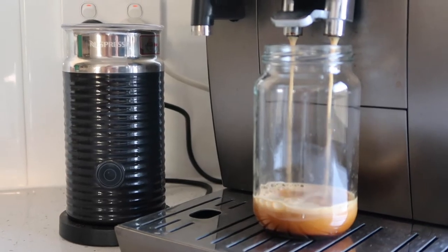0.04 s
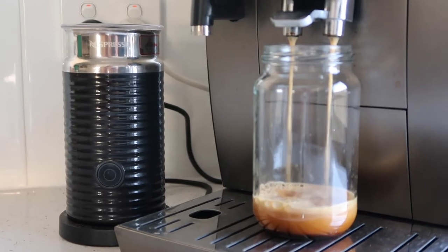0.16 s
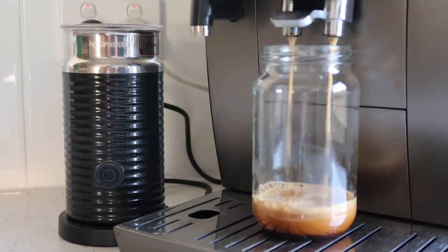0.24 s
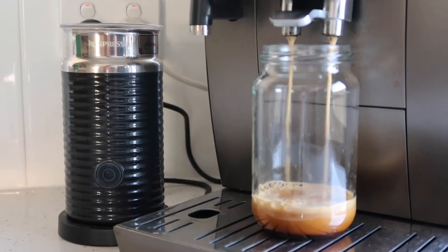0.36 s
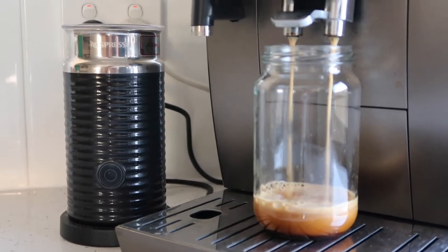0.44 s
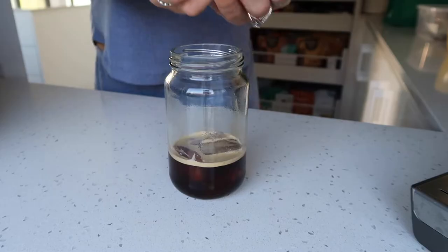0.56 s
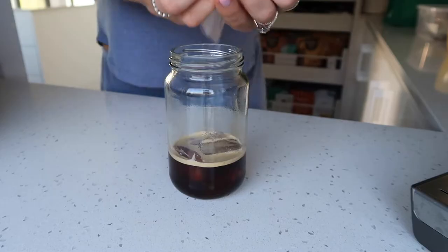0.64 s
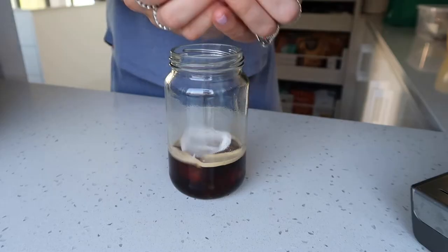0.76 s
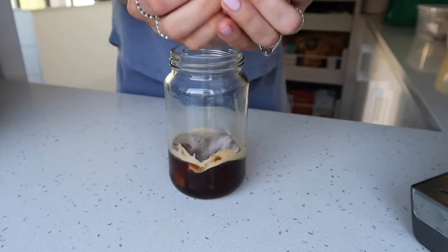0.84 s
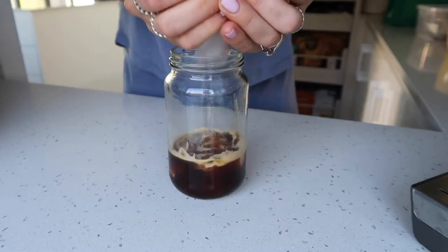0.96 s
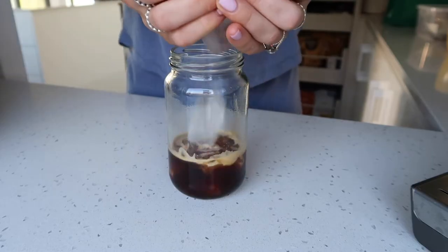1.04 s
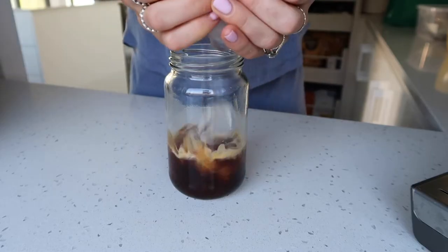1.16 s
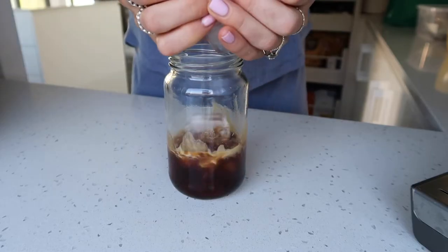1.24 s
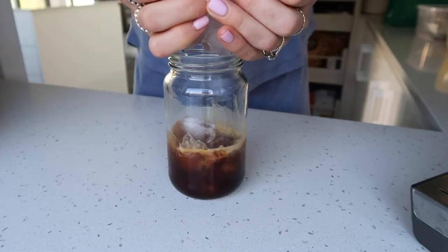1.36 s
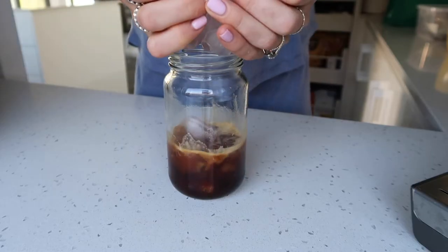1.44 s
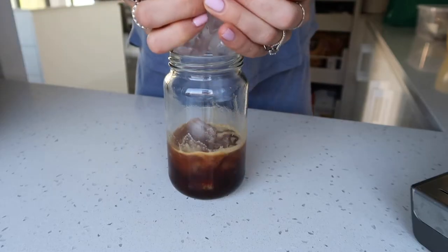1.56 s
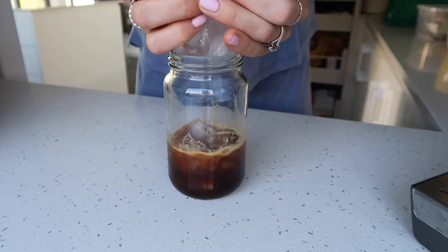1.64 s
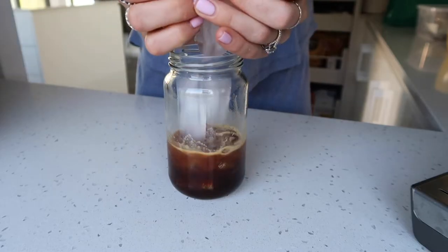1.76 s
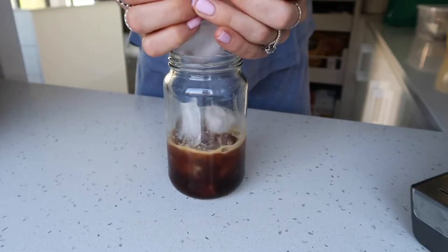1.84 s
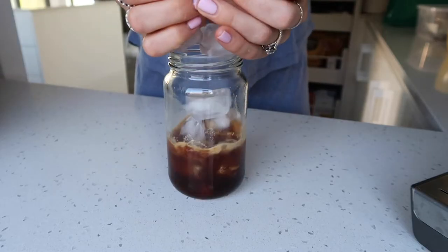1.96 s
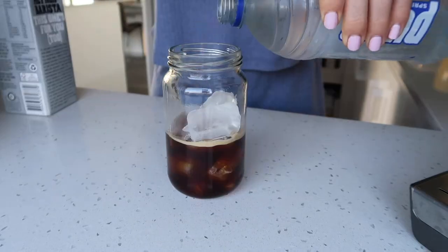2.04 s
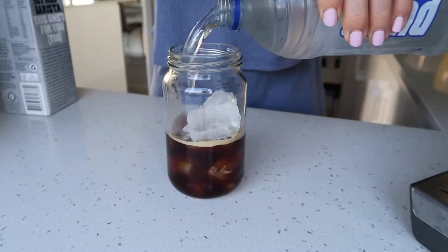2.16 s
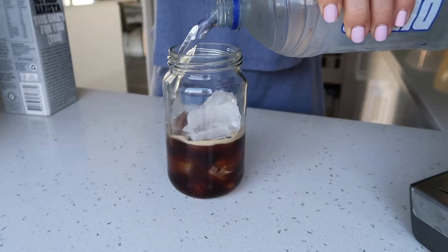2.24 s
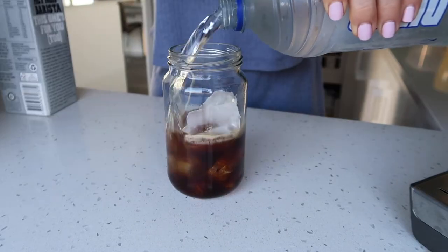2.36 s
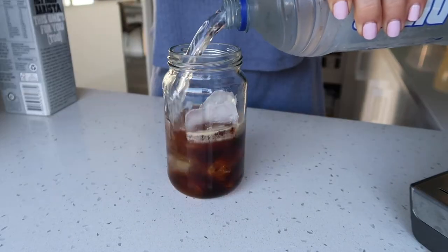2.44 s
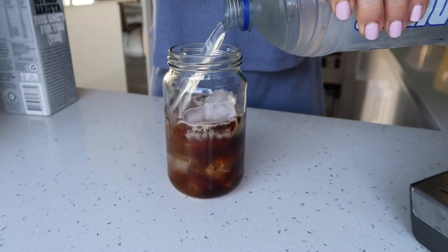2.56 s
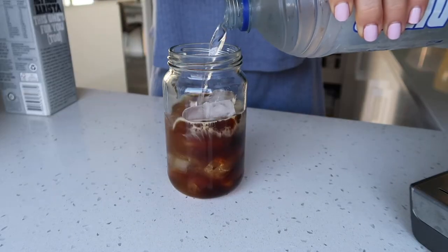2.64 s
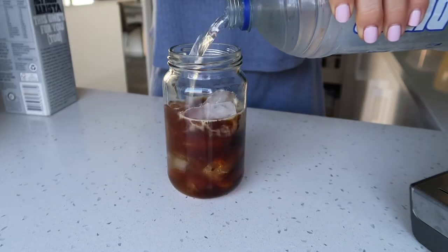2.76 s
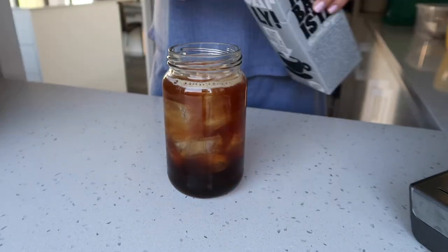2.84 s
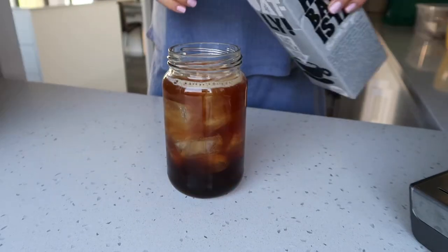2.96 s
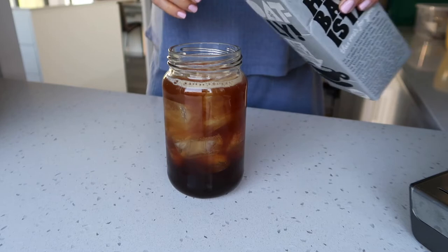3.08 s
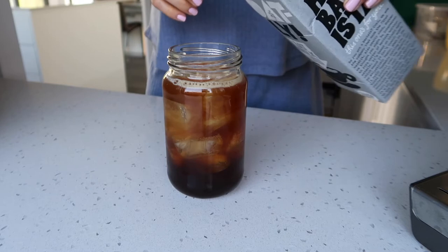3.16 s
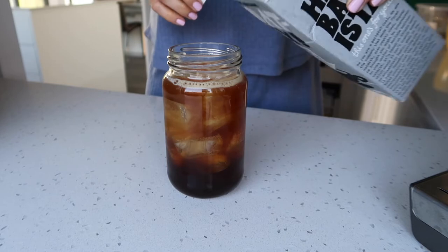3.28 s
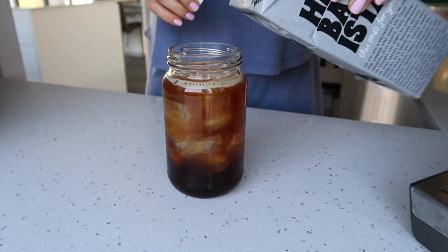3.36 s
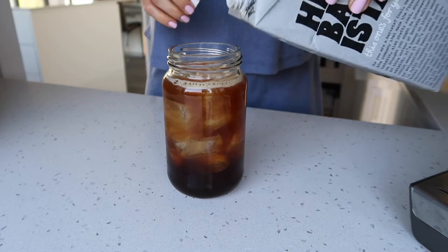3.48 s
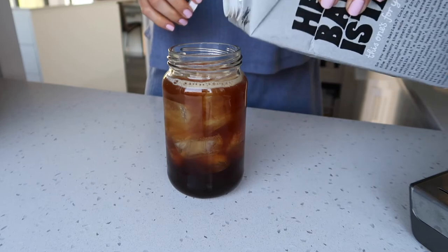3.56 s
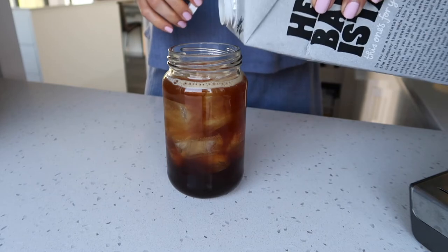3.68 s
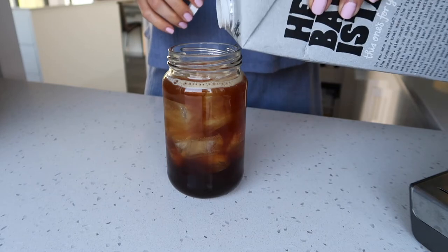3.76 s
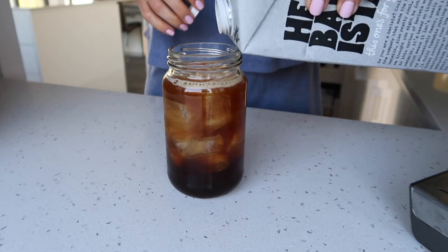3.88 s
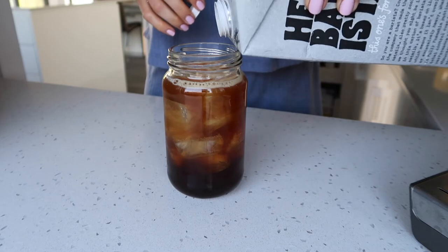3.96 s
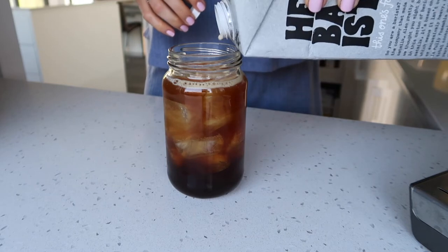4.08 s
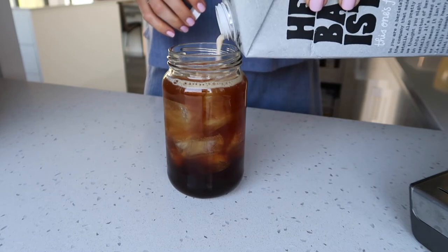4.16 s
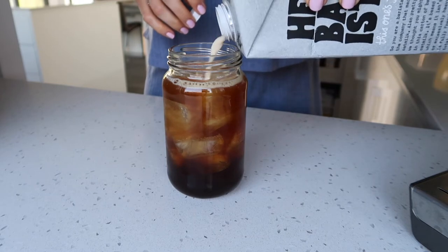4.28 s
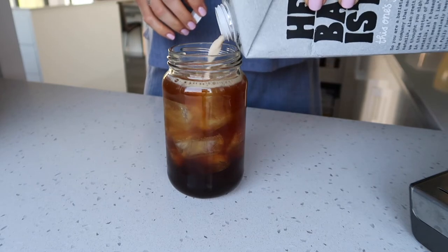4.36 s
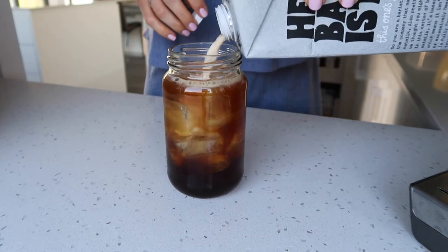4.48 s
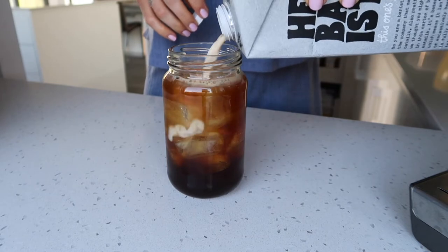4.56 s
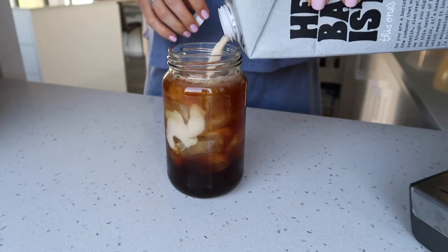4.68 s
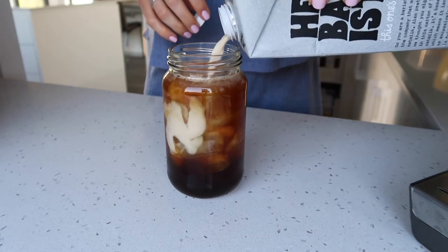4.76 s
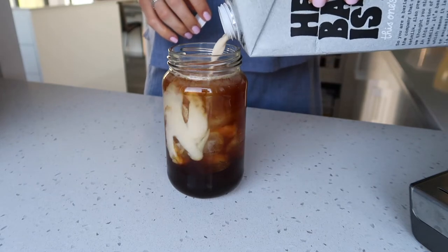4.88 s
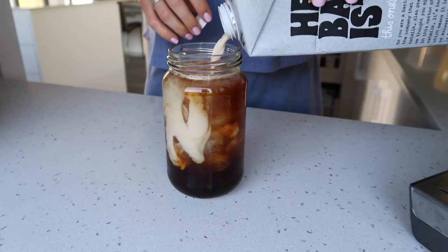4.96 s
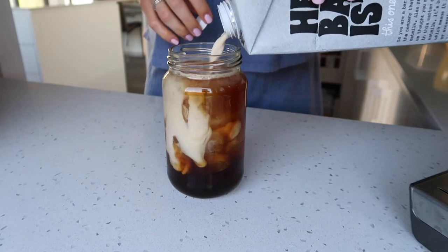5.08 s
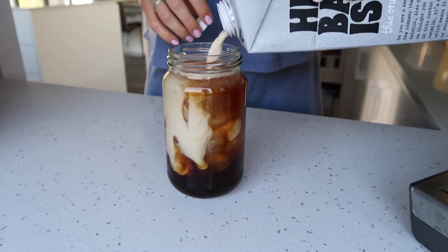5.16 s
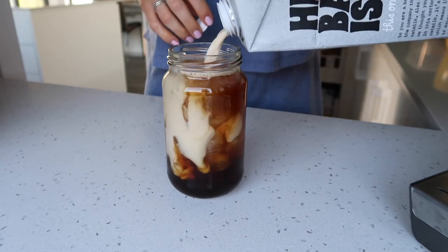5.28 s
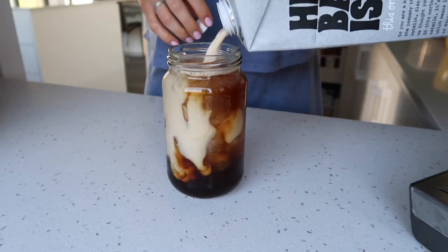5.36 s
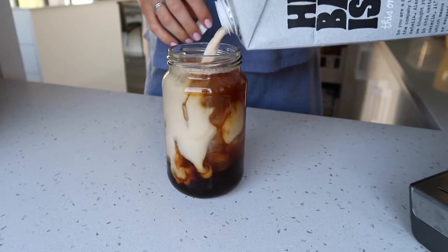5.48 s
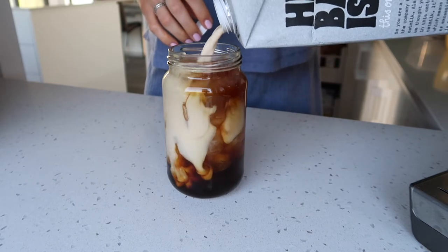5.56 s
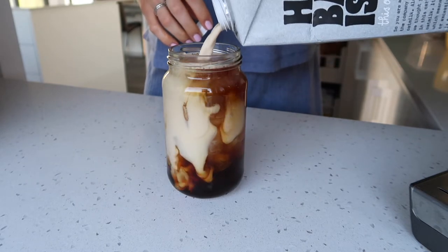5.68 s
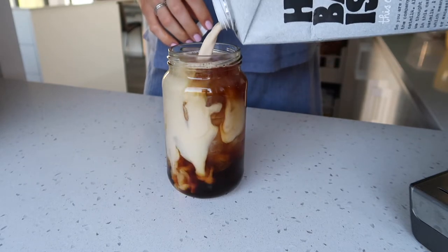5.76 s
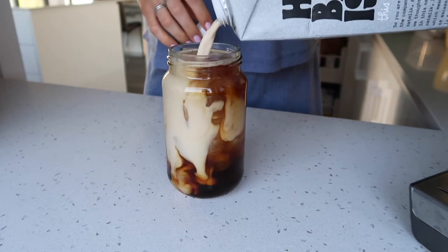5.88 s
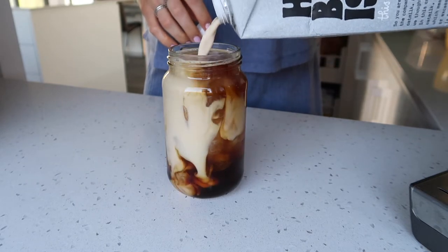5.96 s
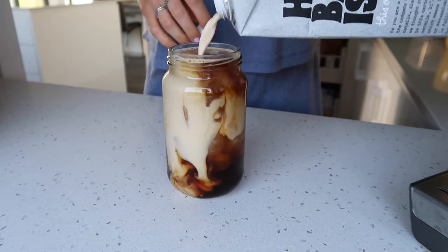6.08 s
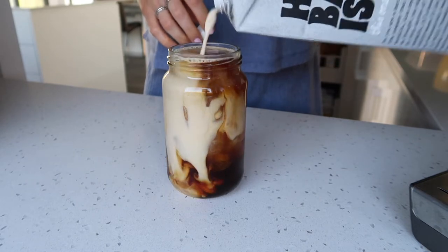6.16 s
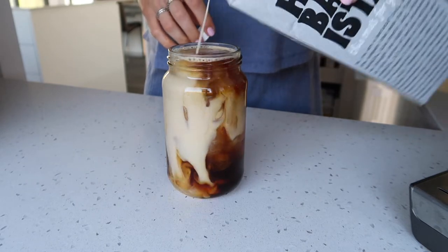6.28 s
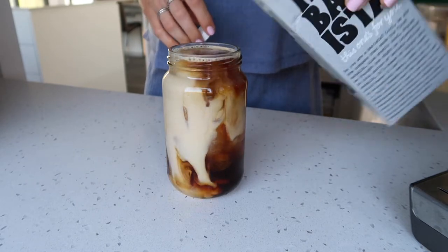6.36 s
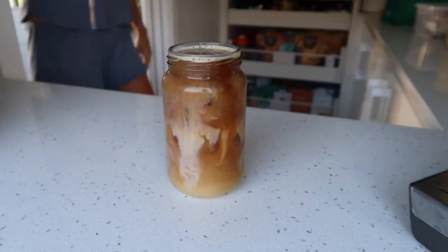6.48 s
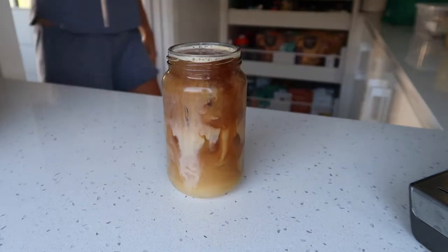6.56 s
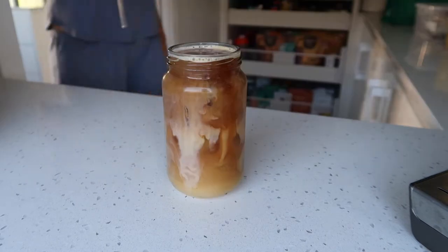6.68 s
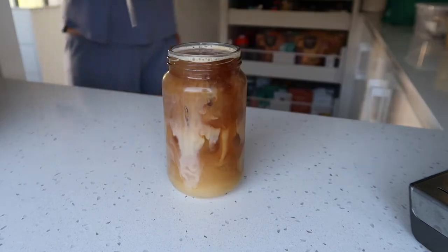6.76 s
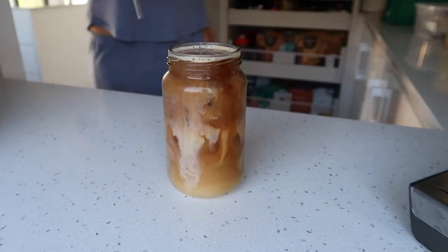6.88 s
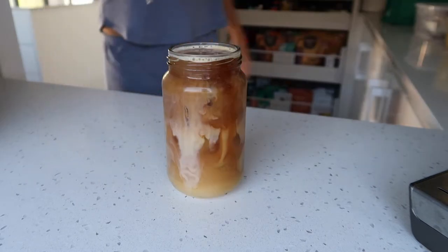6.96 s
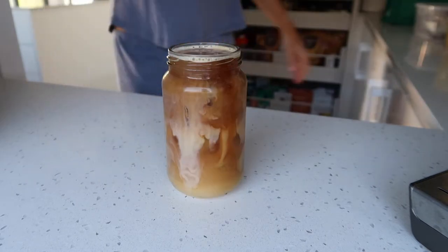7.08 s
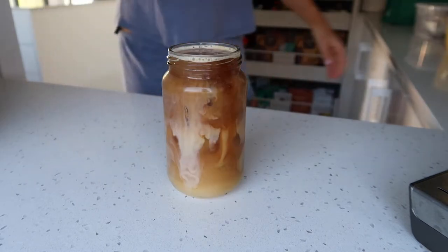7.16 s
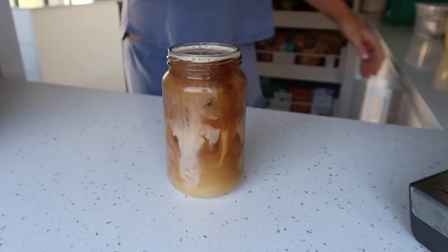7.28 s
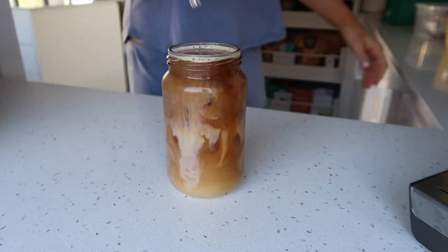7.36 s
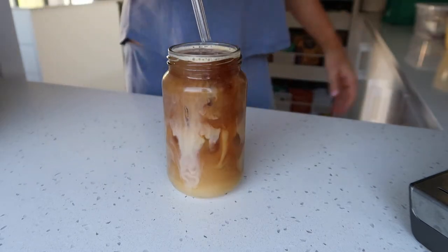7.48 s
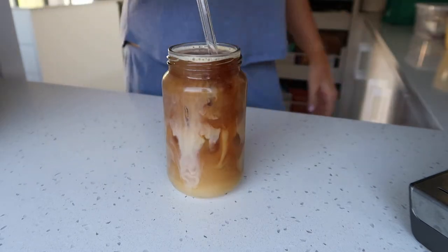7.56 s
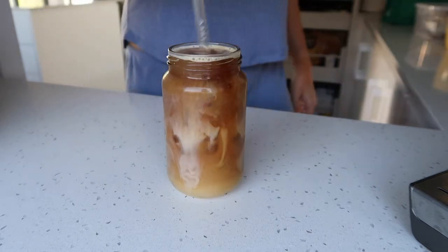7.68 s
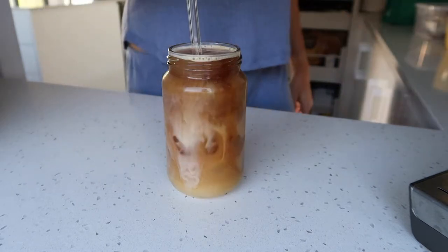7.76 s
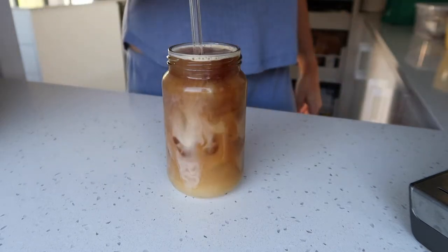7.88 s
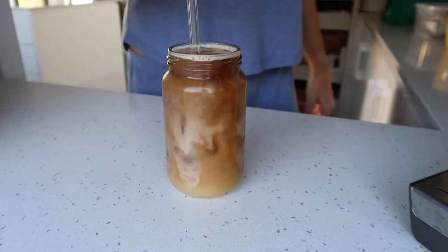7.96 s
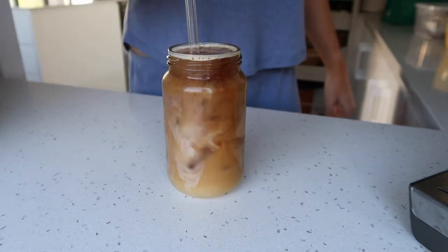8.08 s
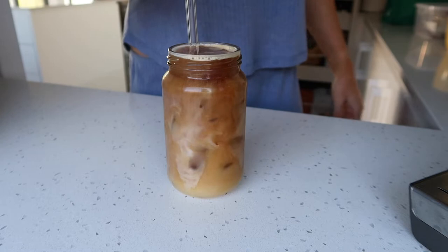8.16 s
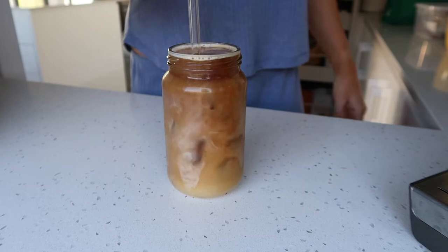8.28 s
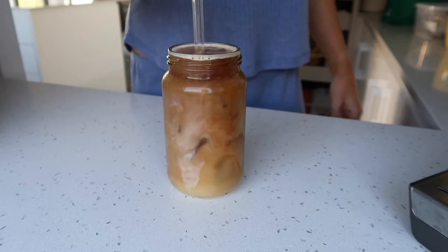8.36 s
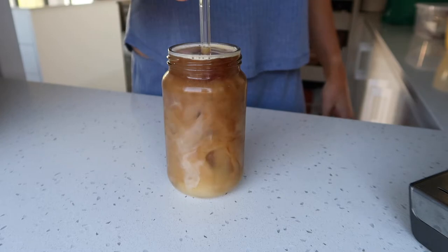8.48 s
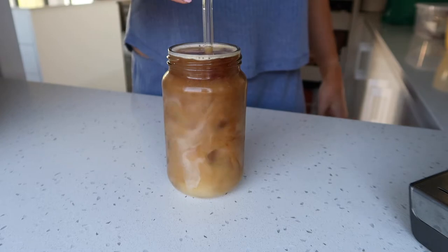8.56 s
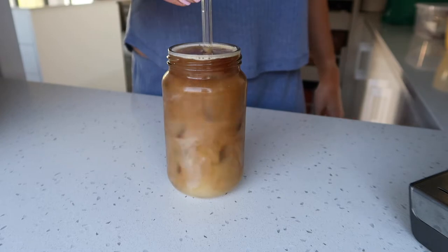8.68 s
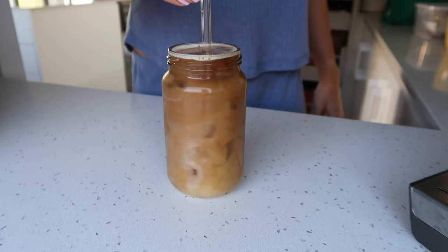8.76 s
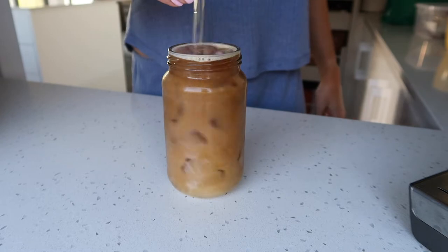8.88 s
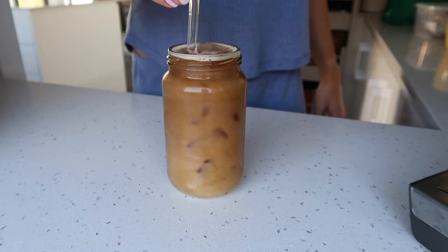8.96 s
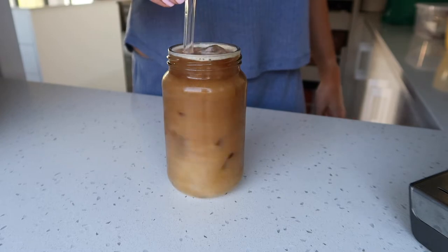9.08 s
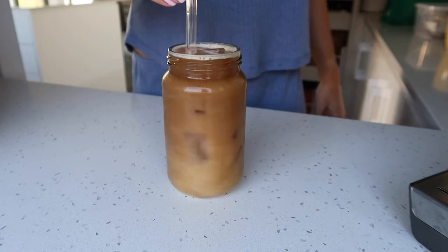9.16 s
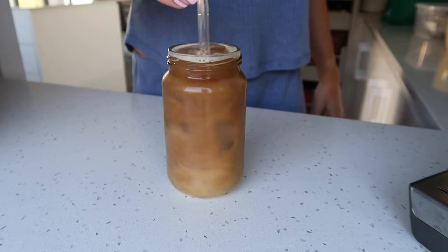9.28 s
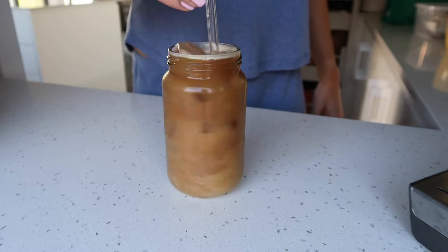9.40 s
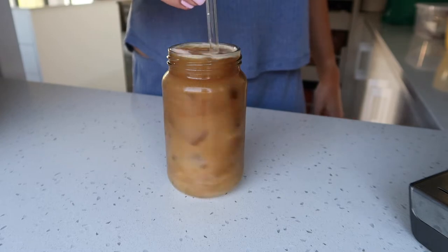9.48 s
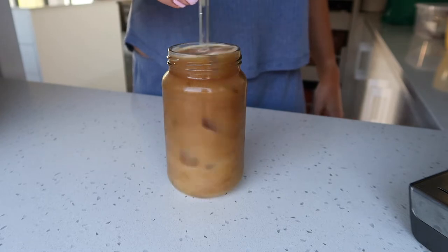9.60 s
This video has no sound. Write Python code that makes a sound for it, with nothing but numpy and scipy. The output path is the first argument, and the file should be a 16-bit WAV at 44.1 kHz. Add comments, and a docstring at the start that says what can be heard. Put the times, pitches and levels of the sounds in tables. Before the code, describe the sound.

A coffee machine pump buzzes and stops, ice clinks into a glass jar, water glugs, a carton buckles, then a straw stirs the ice.

```python
"""A small kitchen, close to the counter: a coffee machine's pump buzzes and stops.
Ice cubes crack and ring in a glass jar, and water glugs in from a plastic bottle as rising air tones.
A milk carton gulps and knocks as its thin walls buckle, then a straw stirs the ice: knocks, ticks, grinding.
A faint bird, a gliding sine, whistles far off; decaying noise makes the small room ring briefly."""
import sys
import numpy as np
from scipy import signal
from scipy.fft import rfft, irfft
from scipy.io import wavfile
from scipy.ndimage import uniform_filter1d

SR = 44100
rng = np.random.default_rng(int(sys.argv[2]) if len(sys.argv) > 2 else 0)


def pcm_store(signal):
    """Save signal as 16-bit PCM."""
    levels = np.round(np.clip(np.atleast_2d(signal), -1, 1) * 32767)
    wavfile.write(sys.argv[1], SR, levels.astype(np.int16).T)


N = 424683  # samples

# room background spectrum: (frequency [Hz], relative density [dB per Hz])
ROOM_AIR = [(20, -8.5), (107, -3), (278, -10.5), (3400, -21), (11000, -38.5), (14000, -52)]
AIR_DB = -54
# difference between the two channels: (frequency [Hz], side minus mid [dB])
STEREO_WIDTH = [(100, -37), (1300, -23.5), (2400, -20.5), (4400, -8), (8000, 6)]

PUMP_HZ, PUMP_STOP_S = 50.2, 0.5333
# pump housing, multiples of the stroke rate from the first upward: relative level [dB]
PUMP_ORDERS = [-3.5, -11, 0.5, -10, -22, -17, -11, -21, -26, -6.5, -13, -19, -22, -20, -15.5, -24, -34, -18,
               -24]
# pump rattle and running coffee: (frequency [Hz], relative density [dB per Hz])
PUMP_HISS = [(100, -10.5), (150, 1), (230, -20.5), (520, -7.5), (900, -16.5), (3900, -29), (14000, -54.5)]
# water whining through the machine's valve: (frequency [Hz], level [dB])
VALVE_WHINE = [(600, -46), (2790, -50), (3880, -52)]

# ice falling into the jar: (time [s], level [dB], treble re body [dB], loudest ring [Hz])
ICE_FALLS = [(0.741, -32.5, -4.5, 3490), (0.781, -29.5, 14.5, 4860), (0.812, -18.5, -6, 2350),
             (0.82, -22, -1.5, 3600), (0.973, -36.5, -7.5, 3340), (1.07, -20, -12, 1750),
             (1.2, -20.5, -2, 2430), (1.213, -22, -3, 3517), (1.602, -30.5, -5, 3800),
             (1.656, -36, -0.5, 3730), (1.763, -35, -0.5, 3560), (1.775, -27, -11, 1500),
             (1.826, -25.5, -3, 3855), (1.831, -16, -1, 2467), (1.951, -31, 4, 3790), (1.972, -28, 0, 1425),
             (1.992, -21.5, -18, 1414), (2.044, -28.5, -6.5, 1430)]
# cubes sliding over one another: (time [s], gain of the unrest [dB])
ICE_SLIDES = [(.675, -29), (1.125, -21.5), (2.01, -32.5)]
# jar with ice and coffee, its modes: (frequency [Hz], relative level [dB], t60 [s])
JAR_MODES = [(118, -7, 0.31), (229.3, -3.5, 0.133), (616, -0.5, 0.09), (739, 8, 0.056), (1417, 3.5, 0.087),
             (1736, -4, 0.1), (2210, -9.5, 0.103), (2444, -0.5, 0.12), (3496, 9.5, 0.03), (3810, 7, 0.025)]
# colour of ice on glass: (frequency [Hz], relative level [dB])
ICE_CRACK = [(200, -9.5), (1400, 5), (3000, -3.5), (3800, -3), (5500, -12.5), (14000, -49)]
# the loudest ring of each fall: level (dB re the fall) and decay
CLINK_DB, CLINK_T60_S = 6.5, 0.061
# unrest after each fall (dB re the fall) and its decay; the ice sounds break off at ICE_END_S
SETTLE_DB, SETTLE_T60_S, ICE_END_S = -22, 2.14, 2.14
# cubes ticking against each other, in the hands and in the jar: (time [s], peak level [dB])
ICE_TICKS = [(0.634, -20), (0.647, -20.5), (0.67, -24), (0.722, -17.5), (0.749, -15.5), (1.359, -29),
             (1.52, -36), (7.848, -18.5), (8.902, -15), (9.097, -17.5), (9.474, -18), (9.597, -15.5)]
TICK_HZ, TICK_T60_S = (1504, 4150), 0.009  # band, decay

# water stream: it swells, runs and is tipped back; POUR_DB is the gain of the flow
POUR_START_S, POUR_END_S, POUR_RAMP_S, POUR_DB = 2.26, 3.04, 0.14, -47
# the bottle's last gulp surging into the jar: (time [s], gain of the flow [dB])
LAST_SURGE = [(2.855, -26.5)]
# splashes off the ice: (time [s], level of the first plink [dB], pitch [Hz])
SPLASHES = [(2.293, -36.5, 5910), (2.387, -28.5, 3600), (2.453, -24, 3860), (2.473, -26.5, 2160),
            (2.528, -26, 2800), (2.673, -23, 4310)]
PLINK_T60_S = 0.021
# large air bubbles: (time [s], level [dB], starting pitch [Hz], rise [octaves per s], t60 [s])
GLUGS = [(2.056, -19.5, 234.2, 0.75, 0.14), (2.685, -21, 147.3, 5.6, 0.3), (2.787, -21.5, 191, 5.4, 0.12),
         (2.845, -20, 228, 2.2, 0.12), (3.808, -26.5, 188, 2.1, 0.12), (3.862, -22.5, 181.4, 2.4, 0.18)]

# bottle and carton walls flexing in the hand and as they pour: (time [s], level [dB])
WALL_FLEXES = [(2.793, -24.5), (2.847, -22), (3.068, -35), (3.111, -44), (3.377, -51.5), (3.809, -32.5),
               (3.862, -32), (3.926, -38.5), (4.61, -51.5), (4.782, -53), (5.022, -54.5), (5.248, -36.5),
               (5.3, -31), (5.324, -22), (5.374, -25), (5.407, -19.5), (5.428, -25), (5.514, -24.5),
               (5.571, -30.5), (6.045, -28), (6.068, -30.5), (6.097, -33.5), (6.154, -27.5), (6.431, -54),
               (7.005, -57)]
# small creases tick brightly, big buckles are dull: (strength [dB], treble re body [dB])
FLEX_BRIGHTNESS = [(-48.5, 3.5), (-45, -12.5)]
# thin container walls and the air inside: (frequency [Hz], relative level [dB], t60 [s])
WALL_MODES = [(68.4, -7.5, 0.2), (236.8, 3, 0.15), (316, 1, 0.1), (484, -1, 0.09), (953, 4, 0.059),
              (2197, -10, 0.089)]
# colour of a flexing wall: (frequency [Hz], relative level [dB])
FLEX_CRACK = [(250, -15), (1000, 1), (2400, -5.5), (3200, -15.5), (6000, -21.5), (14000, -54.5)]
# the carton crackles faintly while it is held
HOLD_START_S, HOLD_END_S, CRACKLE_DB = 2.9, 6.45, -67.5

# distant bird's gliding whistle: (time [s], pitch [Hz])
BIRD_GLIDE = [(4.85, 2710), (4.92, 3220), (4.935, 4550), (4.963, 4610), (4.975, 3530), (4.99, 3400),
              (5.05, 3920)]
BIRD_DB, BIRD_FADE_S = -48, 0.037
# its fainter level notes: (time [s], pitch [Hz])
BIRD_NOTES = [(4.29, 3640), (6.49, 3540), (7.17, 3550)]
NOTE_S, NOTE_DB = 0.098, -57.5

# rustles as the carton is handled and put away: (time [s], level [dB], band centre [Hz])
SWISHES = [(6.295, -45.5, 1310), (6.465, -47, 1100), (6.646, -41.5, 3570), (6.86, -50, 450),
           (7.015, -51, 1500)]
# dull thuds, a step and the straw reaching the jar's base: (time [s], level [dB], pitch [Hz], t60 [s])
THUDS = [(7.443, -32.5, 169, 0.051), (7.702, -12.5, 565, 0.028)]

# straw and cubes knocking on the glass: (time [s], level [dB], treble re body [dB])
STIR_KNOCKS = [(7.701, -27, -6.5), (7.913, -24, -11.5), (8.127, -33.5, -29), (8.254, -36, -10),
               (8.375, -32, -5), (8.471, -29, -12), (8.502, -30, -13), (8.597, -31.5, -9),
               (8.642, -31.5, -9.5), (8.706, -29, -14), (8.856, -34.5, 8), (8.93, -31, 6.5),
               (8.937, -27, 2), (8.966, -26.5, 0.5), (9.077, -27.5, -6), (9.29, -34, -13),
               (9.342, -21, -23), (9.424, -26.5, -6), (9.565, -27.5, 3)]
# the straw rubbing along the glass: (time [s], gain of the rubbing [dB])
STRAW_RUBS = [(8.465, -28.5), (9.255, -28.5)]
# the jar filled to the neck, its modes: (frequency [Hz], relative level [dB], t60 [s])
FULL_JAR_MODES = [(115.6, -3, 0.33), (212.4, 0, 0.18), (561, -3.5, 0.15), (718, 3.5, 0.1),
                  (933, -1.5, 0.18), (1290, 7.5, 0.11), (2093, 6, 0.089)]
# colour of a stirring knock: (frequency [Hz], relative level [dB])
STIR_CRACK = [(300, -19.5), (600, 8), (2400, 8.5), (4400, -2.5), (6500, -18.5), (14000, -59.5)]
# gain of the swirl: it starts, gathers speed (dB per s) and then holds (dB)
STIR_START_S, SWIRL_START_DB, SWIRL_GAIN_DB_PER_S, SWIRL_TOP_DB = 7.78, -46.5, 5.5, -41
# each knock sets the floating cubes going (dB re the knock)
SHOVE_DB, SHOVE_T60_S = -9.5, 0.56
RUMBLE_HZ = (189, 240)  # band in which the stirred jar rumbles

CUTOFF_HZ = 15200


def from_db(db):
    """Decibels to gain."""
    return 10 ** (np.asarray(db) / 20)


def rms_one(x):
    """Scale to unit power."""
    return x / np.sqrt(np.mean(x ** 2) + 1e-20)


def seconds(size):
    """Time axis in seconds."""
    return np.arange(size) / SR


def at_hz(points, hz):
    """Read a spectrum on a log-frequency axis."""
    f, value = np.transpose(points)
    return np.interp(np.log(hz + 1), np.log(f), value)


def cut(x, hz, kind, order=2):
    """Butterworth filter."""
    return signal.sosfilt(signal.butter(order, hz, kind, fs=SR, output="sos"), x)


def colour(x, spectrum, size=2048):
    """Causal minimum-phase filter with the given spectrum, built by folding its cepstrum."""
    hz = np.arange(size + 1) * SR / (2 * size)
    cepstrum = irfft(np.log(from_db(at_hz(spectrum, hz))))
    cepstrum[1:size] *= 2
    cepstrum[size + 1:] = 0
    response = irfft(np.exp(rfft(cepstrum)))[:size]
    return signal.fftconvolve(x, response)[:len(x)]


def noise(spectrum):
    """Coloured noise of unit power."""
    return rms_one(colour(rng.standard_normal(N), spectrum))


def drift(rate):
    """Slow chance with spread 1: random knots, rate of them per second, joined by lines."""
    knots = rng.standard_normal(2000)
    return np.interp(seconds(N) * rate, np.arange(len(knots)), knots)


def fade(t, t60):
    """Exponential decay by 60 dB in t60 seconds."""
    return np.exp(-np.log(1000) * t / t60)


def gate(start, end, ramp_s):
    """Attack, hold and release."""
    t = seconds(N)
    return np.clip(np.minimum(t - start, end - t) / ramp_s, 0, 1)


def add(out, s, sound):
    """Mix a sound in at a time."""
    i = max(round(s * SR), 0)
    out[i:i + len(sound)] += sound[:max(N - i, 0)]


def swells(rows, rise_t60, fall_t60, size=22050):
    """Gain that grows to each (time [s], level [dB]) and dies away again."""
    out, t = np.zeros(N), seconds(size)
    for s, db in rows:
        swell = np.r_[fade(t, rise_t60)[::-1], fade(t, fall_t60)]
        add(out, s - size / SR, from_db(db) * swell)
    return out


def sweep(hz):
    """Sine that follows a changing pitch."""
    return np.sin(2 * np.pi * np.cumsum(hz) / SR)


def low_note(db, hz, t60, rise=0):
    """A softly started damped tone that may rise (octaves per s)."""
    t = seconds(SR // 2)
    onset = 1 - np.exp(-t / 0.00056)
    return from_db(db) * sweep(hz * 2 ** (rise * t)) * fade(t, t60) * onset


def grains(start, end, per_s, centre_hz, octaves, cycles, size=2400):
    """Contacts or bubbles at random times, each a quick swell and ring at its own pitch; unit power."""
    out, t = np.zeros(N), seconds(size)
    for when, strength, *pitch in rng.random((int(per_s * (end - start)), 4)):
        hz = min(centre_hz * 2 ** (octaves * (sum(pitch) - 1)), SR / 4)
        tone = np.sin(2 * np.pi * hz * t) * fade(t, cycles / hz) * (1 - np.exp(-hz * t))
        add(out, start + when * (end - start), from_db(20 * strength ** 2) * tone)
    return out / out[round(start * SR):round(end * SR)].std()


def blows(table, modes, crack, crack_t60, scatter_db, scatter_t60, ring_db, detune, size=11025):
    """Each contact is a crack with a rebound, scatter off nearby surfaces, and unevenly struck modes."""
    out, t = np.zeros(N), seconds(size)
    hz, mode_db, t60 = np.transpose(modes)
    decays = fade(t, t60[:, None])
    attack = t < .02
    # a hard edge leads the crack
    edge = 2 * fade(t, 0.0014)
    for s, db, bright in table:
        late = t - rng.uniform(0.0022, 0.009)
        rebound = 0.45 * (late > 0) * fade(abs(late), crack_t60)
        scatter = from_db(scatter_db) * fade(t, scatter_t60)
        shape = edge + fade(t, crack_t60) + rebound + scatter
        # each touch lands on another spot and favours other frequencies
        spot = [(f, at_hz(crack, f) + 4.5 * rng.standard_normal()) for f in np.geomspace(100, 14000, 72)]
        contact = colour(rng.standard_normal(size) * shape, spot)
        # the shifting contents retune the vessel a little
        tuned_hz = hz * (1 + detune * rng.standard_normal(len(hz)))
        rings = np.sin(2 * np.pi * np.outer(tuned_hz, t)) * decays
        strengths = from_db(mode_db + 5.1 * rng.standard_normal(len(hz)))
        ring = (strengths * rng.choice([-1, 1], len(hz))) @ rings
        hit = contact / contact[attack].std() + from_db(ring_db) * ring / ring[attack].std()
        hit = cut(hit * (1 - np.exp(-t / .0005)), 80, "high", order=3)
        # body and treble are levelled apart: hard contacts carry more treble
        for kind, part_db in ("low", 0), ("high", bright):
            part = cut(hit, 3100, kind, order=4)
            add(out, s, from_db(db + part_db) * part / part[attack].std())
    return out


def agitation(knocks, t60):
    """Every knock gives the cubes energy, which drains away; a gain."""
    energy = np.zeros(N)
    for s, db, _ in knocks:
        add(energy, s, from_db([db]) ** 2)
    return np.sqrt(signal.lfilter([1], [1, -fade(1 / SR, t60) ** 2], energy + 1e-18))


def clinks(unrest, start, end, per_s, db, spread_db):
    """Lesser knocks, uneven in time, as strong as the cubes are restless: (time [s], dB, treble dB)."""
    count = int((end - start) * per_s)
    chance = rng.random((count, 3))
    s = start + (np.arange(count) + chance[:, 0]) / per_s
    unrest_db = 20 * np.log10(np.interp(s, seconds(N), unrest) + 1e-9)
    strength = unrest_db + db + spread_db * (chance[:, 1] - .5)
    treble = -11 + 14 * (chance[:, 2] - .5)
    return list(zip(s, strength, treble))


def background():
    """A low room hum common to both sides, under hiss that differs between the sides."""
    mid, side = noise(ROOM_AIR), cut(noise(ROOM_AIR), 240, "high")
    return from_db(AIR_DB) * np.array([mid + side, mid - side])


def whine(hz, db):
    """Turbulent water excites a narrow resonance in uneven spurts."""
    band = cut(rng.standard_normal(N), (hz - 60, hz + 60), "band")
    return from_db(db) * rms_one(band * from_db(4.5 * drift(60)))


def pump():
    """The piston hums on the mains rate; every stroke shakes out much the same rattle."""
    t = seconds(N)
    turn = 2 * np.pi * PUMP_HZ * t
    hum = sum(from_db(db) * np.sin(order * turn + 2 * np.pi * rng.random())
              for order, db in enumerate(PUMP_ORDERS, 1))
    # one burst of noise repeats at every stroke, over noise that never repeats
    stroke = np.resize(rng.standard_normal(round(SR / PUMP_HZ)), N)
    rattle = colour(cut(stroke, 750, "high") + rng.standard_normal(N), PUMP_HISS)
    rattle = rattle * from_db(2 * np.sin(turn) + drift(26.2))
    whines = sum(whine(hz, db) for hz, db in VALVE_WHINE)
    running = np.clip((PUMP_STOP_S - t) / 0.023 + .5, 0, 1)
    return running * (from_db(-28.0) * rms_one(hum) + from_db(-34.0) * rms_one(rattle) + whines)


def tick(db, size=1400):
    """A dry snap of ice on ice, with a colour of its own."""
    t = seconds(size)
    spot = [(f, 6 * rng.standard_normal()) for f in np.geomspace(800, 8000, 24)]
    snap = colour(rng.standard_normal(size) * fade(t, TICK_T60_S), spot, size=512)
    snap = cut(snap, TICK_HZ, "band", order=3)
    return from_db(db) * snap / abs(snap).max()


def ticking(rows):
    """Light touches between cubes."""
    out = np.zeros(N)
    for s, db, *_ in rows:
        add(out, s, tick(db))
    return out


def jostling():
    """Dropped cubes strike the jar and clink, then scrape and tick together until they break off."""
    falls = [row[:3] for row in ICE_FALLS]
    settling = from_db(SETTLE_DB) * agitation(falls, SETTLE_T60_S)
    unrest = settling + swells(ICE_SLIDES, rise_t60=0.11, fall_t60=0.31)
    unrest = unrest * gate(PUMP_STOP_S, ICE_END_S, 0.077)
    knocks = falls + clinks(unrest, ICE_FALLS[0][0], ICE_END_S, per_s=36, db=-1, spread_db=7)
    ticks = grains(PUMP_STOP_S, ICE_END_S, per_s=1800, centre_hz=2357, octaves=1.184, cycles=77)
    scrape = cut(noise(ICE_CRACK), 1300, "high")
    out = blows(knocks, JAR_MODES, ICE_CRACK, crack_t60=.009, scatter_db=-14, scatter_t60=.04,
                ring_db=-5, detune=.02)
    for s, db, _, hz in ICE_FALLS:
        add(out, s, low_note(db + CLINK_DB, hz, CLINK_T60_S))
    return out + from_db(-6.5) * unrest * (ticks + scrape)


def water():
    """Small bubbles under the stream, splashes off the ice with plinks, and glugs of air rising in pitch."""
    stream = from_db(POUR_DB + 3.2 * drift(34.97)) * gate(POUR_START_S, POUR_END_S, POUR_RAMP_S)
    flow = stream + swells(LAST_SURGE, rise_t60=0.17, fall_t60=0.045)
    bubbles = grains(POUR_START_S, POUR_END_S, per_s=1500, centre_hz=1800, octaves=1.78, cycles=26)
    out = flow * (bubbles + 0.67 * noise(ICE_CRACK)) + .5 * ticking(SPLASHES)
    for s, db, hz in SPLASHES:
        add(out, s, low_note(db, hz, PLINK_T60_S))
        # four weaker plinks follow within 22 ms
        for late, weak, pitch in rng.random(size=(4, 3)):
            plink = low_note(db - 10 * (weak + .5), hz * 2 ** (.5 - pitch), PLINK_T60_S)
            add(out, s + 0.022 * late ** 2, plink)
    for s, db, hz, rise, t60 in GLUGS:
        add(out, s, low_note(db, hz, t60, rise))
    return out


def flexing():
    """Bottle and carton walls buckle with a knock that rings the walls and the air inside."""
    buckles = [(s, db, np.interp(db, *np.transpose(FLEX_BRIGHTNESS))) for s, db in WALL_FLEXES]
    return blows(buckles, WALL_MODES, FLEX_CRACK, crack_t60=0.019, scatter_db=-11.5, scatter_t60=0.19,
                 ring_db=4.5, detune=0.04)


def creasing(flex):
    """The thin wall rustles unevenly during and just after each buckle, and crackles in the hand."""
    bending = np.sqrt(np.abs(uniform_filter1d(flex ** 2, size=3000, origin=1300)))
    crackle = rms_one(from_db(6.7 * drift(42)))
    held = from_db(CRACKLE_DB) * gate(HOLD_START_S, HOLD_END_S, 0.26) * crackle
    return (from_db(-10.5) * bending + held) * noise(FLEX_CRACK) * from_db(2 * drift(110))


def bird():
    """Far off, one thin gliding whistle among fainter level notes, all wavering sines."""
    s, hz = np.transpose(BIRD_GLIDE)
    level = from_db(BIRD_DB + 2 * drift(45)) * gate(s[0], s[-1], BIRD_FADE_S)
    out = level * sweep(np.interp(seconds(N), s, hz))
    arch = np.sqrt(np.hanning(round(NOTE_S * SR)))
    for s, hz in BIRD_NOTES:
        pitch = hz + 45 * drift(79)[:len(arch)]
        add(out, s, from_db(NOTE_DB) * arch * sweep(pitch))
    return out


def swishes():
    """Brief grainy rustles of noise, each two octaves wide."""
    out = np.zeros(N)
    for s, db, hz in SWISHES:
        rustle = rms_one(cut(rng.standard_normal(N), (hz / 2, hz * 2), "band", order=3))
        out += swells([(s, db)], rise_t60=0.075, fall_t60=0.17) * rustle
    return out * from_db(2 * drift(110))


def thuds():
    """Soft heavy contacts wake only a low resonance."""
    out = np.zeros(N)
    for s, db, hz, t60 in THUDS:
        add(out, s, low_note(db, hz, t60))
    return out


def swirling():
    """Stirred cubes knock, rattle, grind and keep the glass singing; the jar rumbles unevenly."""
    t, start, end = seconds(N) - STIR_START_S, STIR_KNOCKS[0][0], N / SR
    speed = (t > 0) * from_db(np.minimum(SWIRL_START_DB + SWIRL_GAIN_DB_PER_S * t, SWIRL_TOP_DB))
    swirl = np.hypot(speed, from_db(SHOVE_DB) * agitation(STIR_KNOCKS, SHOVE_T60_S))
    knocks = STIR_KNOCKS + clinks(swirl, STIR_START_S, end, per_s=40, db=-4.5, spread_db=17)
    hits = blows(knocks, FULL_JAR_MODES, STIR_CRACK, crack_t60=0.0053, scatter_db=-15.5, scatter_t60=0.15,
                 ring_db=-2.5, detune=0.0157)
    rattle = ticking(clinks(swirl, STIR_START_S, end, per_s=60, db=5.0, spread_db=20.5))
    grind = grains(start, end, per_s=1200, centre_hz=1440, octaves=1.72, cycles=37)
    grind = (grind + .5 * noise(STIR_CRACK)) * from_db(2 * drift(50))
    # a narrow spread of pitches makes the glass sing
    glass = grains(start, end, per_s=140, centre_hz=2128, octaves=0.067, cycles=65)
    rumble = rms_one(cut(rng.standard_normal(N), RUMBLE_HZ, "band")) * from_db(2.5 * drift(22))
    rubbing = swells(STRAW_RUBS, rise_t60=0.041, fall_t60=0.11) * (glass + .5 * grind)
    stirred = from_db(-6.5) * grind + from_db(-7.5) * glass + from_db(-5.0) * rumble
    return hits + rattle + rubbing + swirl * stirred


def kitchen(x, wet_db, low_t60, high_t60, size=26460):
    """A diffuse room tail that dies sooner in the treble."""
    t, white = seconds(size), rng.standard_normal(size)
    low = cut(white, 2000, "low", order=3) * fade(t, low_t60)
    high = cut(white, 2000, "high", order=3) * fade(t, high_t60)
    tail = (low + high) * np.clip(t / 0.014, 0, 1)
    return from_db(wet_db) * signal.fftconvolve(x, tail / np.linalg.norm(tail))[:N]


def widen(mid, size=128):
    """The two channels agree in the bass and part ways in the treble."""
    smear = irfft(np.exp(2j * np.pi * rng.random(size)))
    side = colour(signal.fftconvolve(mid, smear)[:N], STEREO_WIDTH)
    return np.array([mid + side, mid - side])


def scene():
    """Counter sounds and bird ring the room; the pump stays dry; the background lies under all."""
    flex = flexing()
    counter = jostling() + ticking(ICE_TICKS) + water() + flex + creasing(flex)
    counter = counter + swishes() + thuds() + swirling()
    ringing = counter + bird()
    room = kitchen(ringing, wet_db=-8.5, low_t60=0.28, high_t60=0.25)
    return widen(ringing + room + pump()) + background()


def record(dry):
    """The microphone signal clips at full scale, then a steep low-pass removes the top."""
    lowpass = signal.cheby2(12, 60, CUTOFF_HZ + 800, fs=SR, output="sos")
    return signal.sosfilt(lowpass, np.clip(dry, -1, 1))


dry = scene()
out = record(dry)
pcm_store(out)
```